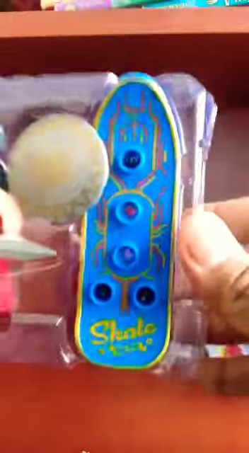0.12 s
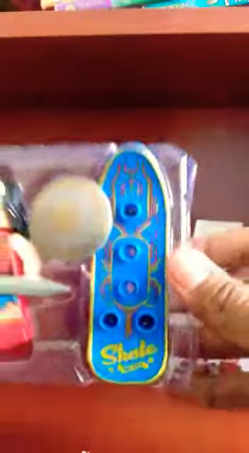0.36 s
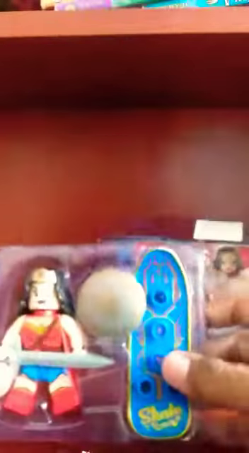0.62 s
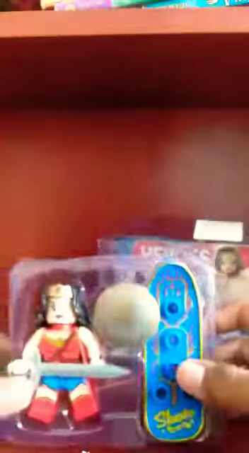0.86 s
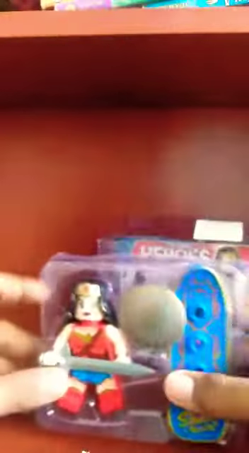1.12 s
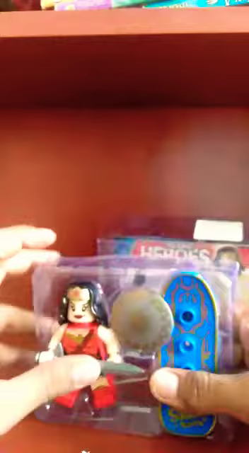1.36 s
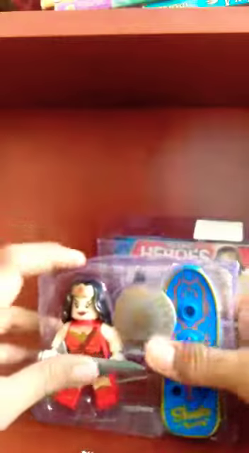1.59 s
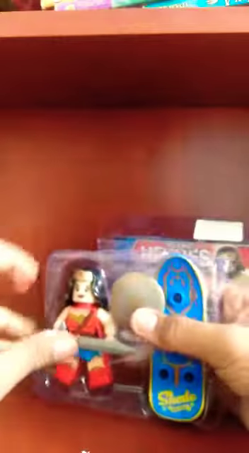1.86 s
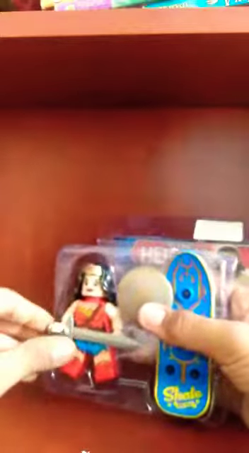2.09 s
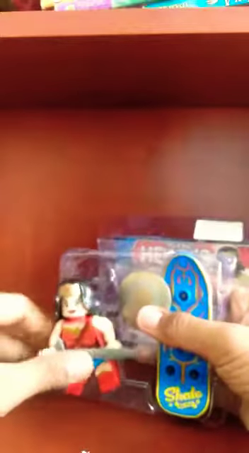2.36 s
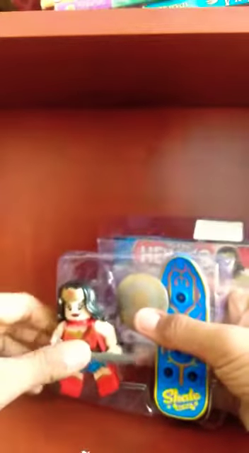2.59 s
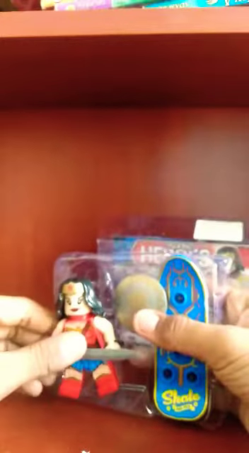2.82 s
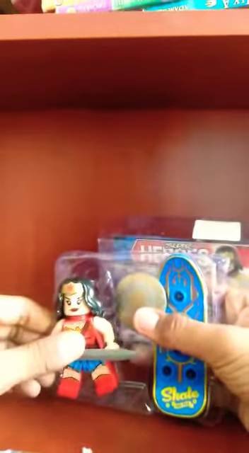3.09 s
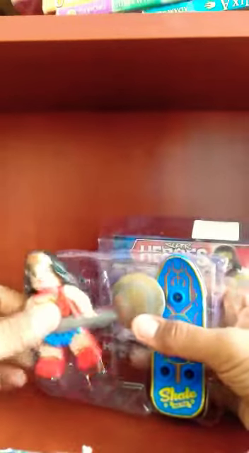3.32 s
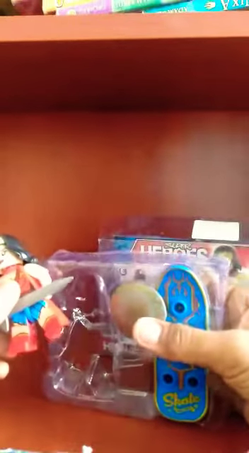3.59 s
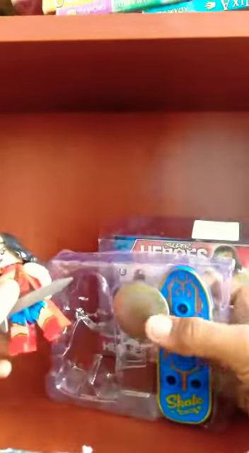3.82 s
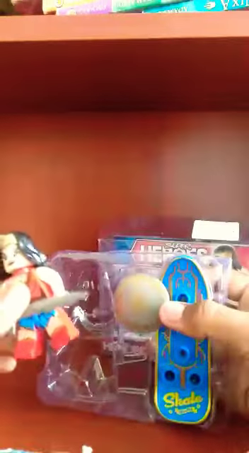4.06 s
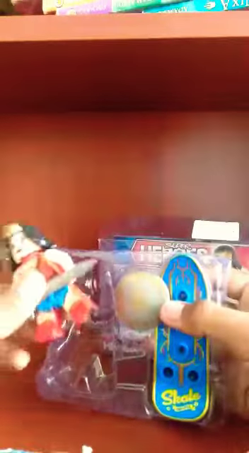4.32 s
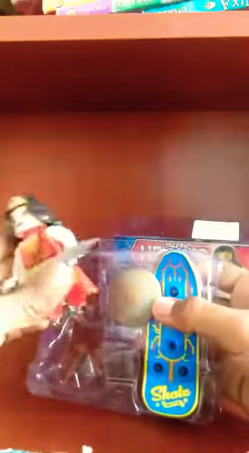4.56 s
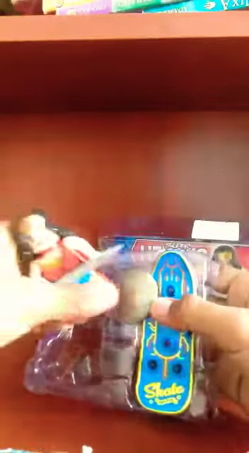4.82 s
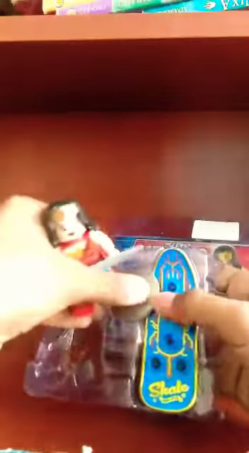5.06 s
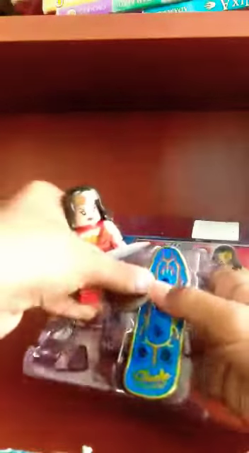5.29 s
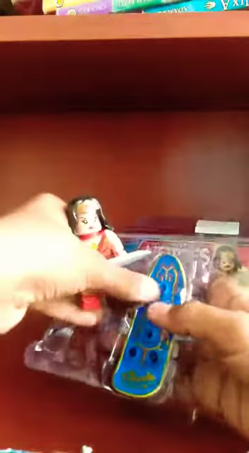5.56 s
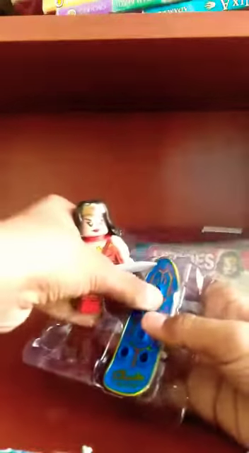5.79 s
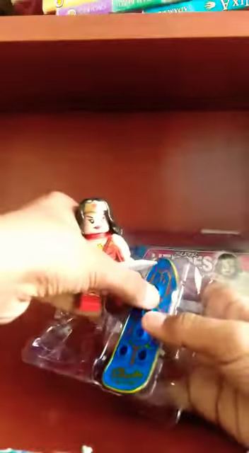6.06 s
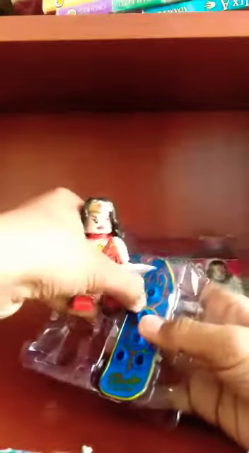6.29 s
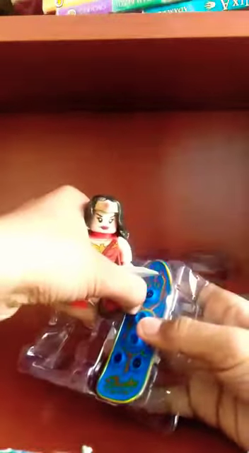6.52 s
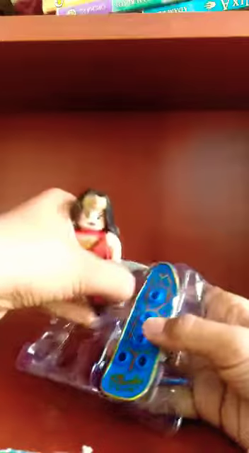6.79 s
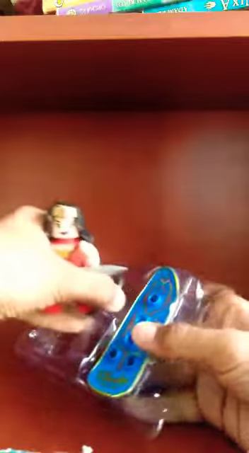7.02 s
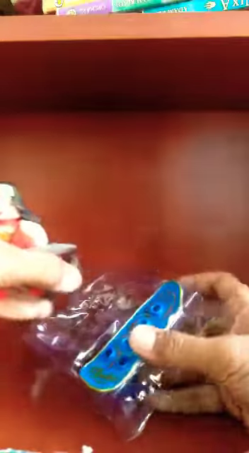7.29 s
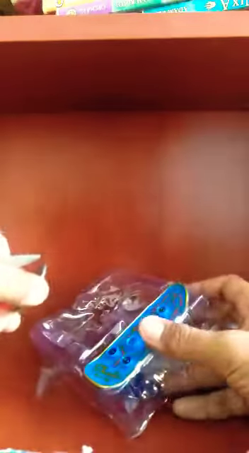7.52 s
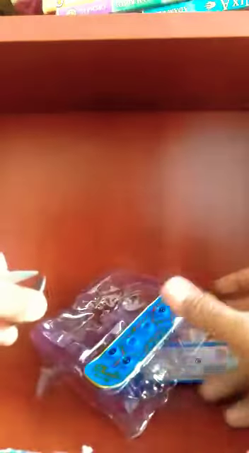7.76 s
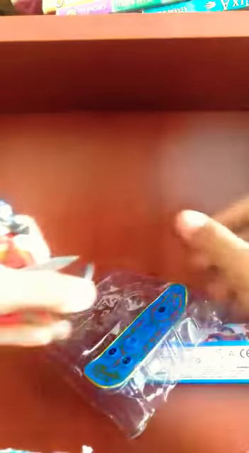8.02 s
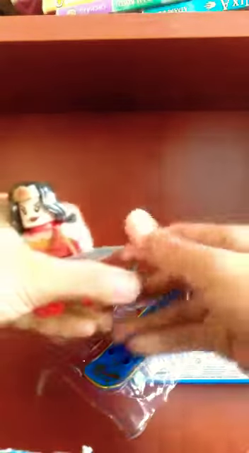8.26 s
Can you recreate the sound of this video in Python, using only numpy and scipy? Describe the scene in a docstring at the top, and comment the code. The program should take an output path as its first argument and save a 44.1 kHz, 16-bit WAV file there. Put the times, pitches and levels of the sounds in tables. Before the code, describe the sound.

Thin clear plastic tray crackles, snaps and pops sharply in two busy spells as hands pull toys free, close up indoors.

```python
"""On a wooden shelf in a quiet room, hands pull toys out of a thin clear plastic tray, heard close up.
Buckles snap as short rings of tray modes with a noise crack; drags are swelling bursts of coloured noise.
Random creases make a dense crackle, and the tray's sharp sounds get a faint room answer.
The shelf murmurs and thuds in low noise under the hands; steady hum, hiss and rumble lie behind."""
import sys
import numpy as np
from scipy import signal
from scipy.fft import rfft, irfft, next_fast_len
from scipy.io import wavfile
from scipy.ndimage import map_coordinates

SR = 44100
rng = np.random.default_rng(int(sys.argv[2]) if len(sys.argv) > 2 else 0)


def transcribe(signal):
    """Save signal, clipped to [-1, 1], as a 16-bit WAV file at the path in sys.argv[1]."""
    frames = np.atleast_2d(signal).T
    limited = np.clip(frames, -1, 1)
    pcm = np.round(limited * 32767).astype(np.int16)
    wavfile.write(sys.argv[1], SR, pcm)


def voltage_ratio(decibels):
    """Convert decibels (scalar or array-like) to amplitude ratios, 20 dB per decade."""
    exponent = np.asarray(decibels, float) / 20
    return 10 ** exponent


N = 369999  # samples

# Buckles: (time [s], ring peak [dB], panel pitch [Hz], hollow-mode offset [dB], crack offset [dB])
BUCKLES = [(0.199, -37.5, 1560, -11, -16), (0.224, -33, 878, -29, -16.5), (0.681, -31.5, 1085, -9.5, -17),
           (0.767, -27.5, 1380, -19, -31), (0.781, -23, 1130, -8, -41), (0.924, -28, 1085, -5, -31),
           (0.992, -21.5, 1040, -18, -32), (1.077, -21.5, 1030, -9, -30), (1.09, -18, 1040, -10, -25),
           (1.098, -12.5, 1030, -22, -25), (1.109, -8.5, 1535, -37, -24.5), (1.127, -28, 1560, -23, -17),
           (1.208, -18, 1040, -13, -14.5), (1.28, -25.5, 1135, -29, -34), (1.295, -29.5, 2035, -38, -13.5),
           (1.305, -29.5, 1460, -29, -13), (1.367, -35.5, 1390, 14, -27), (1.401, -32.5, 1040, -17, -33),
           (1.61, -29.5, 1040, -10, -22), (1.633, -11, 1120, -28, -22.5), (1.64, -20.5, 1000, -14, -36),
           (1.75, -29, 1055, -15, -31), (1.792, -30.5, 1020, -10, -28), (2.175, -32.5, 1160, -16.5, -26),
           (2.223, -16.5, 1164, -12.5, -32), (2.249, -22, 1200, -10.5, -27), (2.28, -23.5, 1870, -10, -38),
           (2.361, -24.5, 1210, -15.5, -44), (2.449, -31, 1730, -13, -15), (2.458, -31.5, 1730, -15, -12),
           (2.539, -18.5, 1150, -18, -25.5), (2.68, -32.5, 1250, -19, -42), (2.716, -31, 1200, -23, -42),
           (3.214, -30, 1110, -6, -43), (4.197, -26.5, 1190, -12, -44), (4.266, -35, 1090, -21, -39),
           (4.438, -35.5, 1104, -8, -31), (4.784, -36, 1110, 12, -35), (4.795, -32.5, 880, 10, -39),
           (4.923, -33.5, 960, -13, -33), (5.157, -28.5, 1130, -20, -36), (5.21, -31, 1020, -10, -31),
           (5.259, -30, 1150, -12, -30), (5.434, -32, 1040, -17, -25), (5.453, -29, 1070, -20, -19),
           (5.496, -30.5, 1190, -35, -20), (5.513, -21.5, 1094, -38, -11), (5.525, -19.5, 1080, -24, -17),
           (5.538, -19, 1040, -23, -14.5), (5.576, -26.5, 1530, -15, -17), (5.599, -26, 1420, -24, -17),
           (5.616, -16.5, 1120, -37, -40), (5.667, -19.5, 1140, -21, -19), (5.677, -20.5, 1040, -25, -10),
           (5.7, -16, 1044, -48, -15), (5.711, -32, 1030, -21, -12), (5.761, -21.5, 1260, -10, -25),
           (5.796, -22.5, 1040, -21, -14.5), (5.841, -25.5, 1020, -11, -33), (5.864, -23.5, 1055, -12, -21),
           (5.935, -32, 1320, -11, -24), (6.16, -33, 1100, -13, -30), (6.39, -28.5, 1040, -9.5, -23),
           (6.548, -10.5, 1095, -15, -19.5), (6.668, -10, 1180, -13.5, -21),
           (6.709, -7.5, 1060, -13.5, -23.5), (6.765, -25, 920, -16, -17), (6.9, -32, 1210, -12, -15.5),
           (6.957, -22, 1450, -32, -9), (6.998, -27, 1170, -28, -21), (7.194, -27.5, 1010, -42, -23),
           (7.214, -28, 1000, -23, -29), (7.231, -30, 1450, -23, -30), (7.272, -28, 1540, -28, -19),
           (7.319, -29.5, 1310, -28, -33)]
# Nominal tray modes: (frequency [Hz], level [dB], t60 [s])
TRAY_MODES = [(296, -18, 0.034), (493, -5, 0.055), (603.7, -5.5, 0.066), (762, -5.5, 0.034),
              (1040, -2.5, 0.047), (1200, -6, 0.056), (1400, -8, 0.039), (1605, -5.5, 0.057),
              (1983, 4.5, 0.021), (2313, -1.5, 0.03), (2633, -10.5, 0.019), (3204, -10, 0.019),
              (3705, -14, 0.015), (4060, -16, 0.029)]
# Upper-mode level as the grip moves over the tray: (time [s], level [dB])
GRIP_BITE = [(0.2, -3.5), (0.8, -12), (1.1, -3.5), (1.25, -16), (1.63, -4), (2.2, -9.5), (2.36, -5),
             (2.54, -3), (2.72, -7.5), (3.2, -16), (4.2, -6), (4.3, -24), (5.3, -15), (5.55, -5),
             (5.68, -17), (5.84, -11), (5.87, -3), (6.55, -14), (6.67, -1.5), (7.3, -7.5)]
BITE_PER_OCTAVE_DB = 2  # higher snaps bite more
# Plastic dragged on plastic: (time [s], length [s], body level [dB], fizz level [dB], panel pitch [Hz])
DRAGS = [(0.764, 0.19, -41.5, -75, 1100), (0.889, 0.054, -39.5, -60.5, 1070),
         (1.073, 0.16, -36.5, -50.5, 1300), (1.246, 0.064, -43, -61, 1090), (1.631, 0.048, -52, -52, 1100),
         (1.743, 0.1, -43, -60, 1090), (2.184, 0.041, -43.5, -63, 1150), (2.248, 0.11, -43.5, -64, 1130),
         (2.413, 0.031, -43, -61, 1500), (2.456, 0.041, -61, -72, 3450), (2.547, 0.081, -62, -77, 3070),
         (3.201, 0.11, -45, -86, 1080), (3.519, 0.11, -54.5, -82, 1100), (3.865, 0.083, -56, -66, 1020),
         (3.96, 0.12, -43, -64, 1070), (4.385, 0.13, -48, -67, 1040), (4.802, 0.027, -42.5, -80, 1020),
         (5.014, 0.098, -45.5, -86, 1000), (5.139, 0.034, -41.5, -67, 1070), (5.203, 0.057, -42, -63, 1040),
         (5.296, .07, -44.5, -60, 1060), (5.548, 0.066, -37.5, -54, 1440), (5.738, 0.077, -44, -60, 1030),
         (5.865, 0.049, -46, -67, 1050), (5.87, 0.088, -56, -71, 2860), (6.27, .06, -45.5, -71, 680),
         (6.36, 0.053, -43.5, -63, 1110), (6.548, 0.098, -34.5, -47, 1910), (6.636, 0.04, -36, -40, 1600),
         (6.69, .09, -51, -57, 1880), (6.938, 0.044, -31.5, -38, 2140), (6.98, 0.036, -41, -51, 1860),
         (7.14, 0.13, -44.5, -60, 980), (7.226, 0.089, -44, -61, 1400), (7.312, 0.054, -45, -73, 1390)]
PANEL_DB = 15  # rubbed panel over the top of the crackle spectrum
LIGHT_DB, SPREAD_PER_DB = -47.5, 1.07  # harder drags shake the whole tray: the panel stands out less
# Spectrum of the rustling body: (frequency [Hz], relative level [dB])
BODY_SPECTRUM = [(150, -52), (250, -26.5), (474, -0.5), (668, -4), (788, -5.5), (1120, 3), (1280, -1),
                 (1890, -4), (2570, -14), (2810, -21), (3500, -24), (4550, -47), (7700, -120)]
# Spectrum of the fine fizz and the cracks: (frequency [Hz], relative level [dB])
FIZZ_SPECTRUM = [(1530, -22), (2600, -2.5), (2790, -3.5), (3890, -2), (4640, -9.5), (6280, -1.5),
                 (8960, -17.5), (12100, -15), (13100, -12.5), (14900, -10), (16100, -23), (16500, -44)]
# Crackle of the strained tray: (time [s], body level [dB], fizz level [dB])
STRAIN_LEVELS = [(0.0, -71, -92), (0.2, -60.5, -63), (0.58, -48, -59.5), (0.75, -52.5, -59),
                 (1.11, -44, -64), (1.55, -52, -60.5), (1.8, -48, -63.5), (2.15, -59.5, -65.5),
                 (2.6, -95, -103), (2.82, -57.5, -61), (3.3, -61, -86), (3.57, -59, -66), (4.2, -62, -76),
                 (4.6, -55, -69), (4.75, -60, -69), (5.2, -59, -77.5), (5.62, -43, -59),
                 (5.9, -52.5, -65.5), (6.101, -44.5, -63), (6.5, -48.5, -59.5), (6.68, -32.5, -39.5),
                 (6.89, -57.5, -74), (7.0, -50, -66), (7.27, -50, -59.5), (7.42, -49.5, -64.5),
                 (7.5, -69, -94)]
# Decay of the room answer: (frequency [Hz], t60 [s])
ROOM_DECAY = [(300, 0.26), (1200, 0.17), (6000, 0.3), (15000, 0.21)]
# Spectrum of the shelf: (frequency [Hz], relative level [dB])
SHELF_SPECTRUM = [(60, -15), (100, 3.5), (140, -7), (185, 10.5), (230, 4), (295, 9), (400, 4), (600, -46)]
SHELF_UNDER_DB = -14.5  # shelf murmur relative to the crackle's body
# Hands or tray bear down on the shelf: (time [s], hold [s], level [dB], board pitch [Hz])
SHELF_PRESSES = [(0.6, .03, -72, 300), (0.905, 0.023, -58, 300), (0.996, 0.015, -57, 200),
                 (1.1, 0.041, -53, 252), (1.27, 0.027, -56, 252), (1.643, 0.018, -54, 302),
                 (2.306, 0.12, -66, 302), (3.254, 0.03, -56, 350), (4.269, 0.068, -44.5, 199),
                 (4.392, 0.042, -55, 200), (4.563, 0.023, -55.5, 190), (5.596, 0.18, -47, 142),
                 (5.767, 0.062, -49, 354), (5.865, .03, -47, 280), (6.267, 0.031, -52, 247),
                 (6.68, .06, -42, 230)]
PRESS_RISE_S, PRESS_FALL_S = 0.0075, 0.014  # time constants
BOARD_DB = 15.5  # pressed board over the shelf spectrum
# The tray is set down, one row: (time [s], push gain [dB], push time scale [s])
SET_DOWN = (7.557, -39, .0016)
# Spectrum of room air and microphone hiss: (frequency [Hz], relative level [dB])
AIR_SPECTRUM = [(12, -29), (20, 1), (135, -9), (200, -7), (297, -12), (506, -5), (794, -9), (1140, -4),
                (1560, -7), (1900, -12), (4530, -28), (6350, -24), (8410, -35), (14700, -30), (16500, -42)]
# Spectrum of the low rumble: (frequency [Hz], relative level [dB])
RUMBLE_SPECTRUM = [(12, -15), (22, 5.5), (50, -15), (90, -10), (130, -41.5)]
AIR_DB, RUMBLE_DB = -56, -62.0
# Microphone band edge: (frequency [Hz], gain [dB])
BAND_EDGE = [(20, 0), (15600, 0), (15900, -22), (20000, -22)]


def unit(x):
    """Scales x to rms 1."""
    return x / np.sqrt(np.mean(x ** 2) + 1e-20)


def coloured(x, points):
    """Filters x by (frequency [Hz], gain [dB]) points joined on a log-frequency axis."""
    size = next_fast_len(len(x) + 8192)
    hz, db = np.transpose(points)
    bin_hz = np.fft.rfftfreq(size, 1 / SR)
    gain_db = np.interp(np.log(bin_hz + 1), np.log(hz + 1), db)
    return irfft(rfft(x, size) * voltage_ratio(gain_db), size)[:len(x)]


def wobble(rate_hz):
    """Smooth random curve with rate_hz knots a second."""
    knots = rng.standard_normal(int(N * rate_hz / SR) + 4)
    return map_coordinates(knots, [np.arange(N) * rate_hz / SR])


def snaps():
    """Each buckle rings the tray modes nearest its pitch, sounds the hollow pockets, bites and cracks."""
    t = np.arange(SR // 8) / SR
    hz, mode_db, t60_s = np.transpose(TRAY_MODES)[:, :, None]
    out = np.zeros(N + len(t))
    for start_s, peak_db, ring_hz, hollow_db, crack_db in BUCKLES:
        bite_db = np.interp(start_s, *np.transpose(GRIP_BITE))
        bite_db += BITE_PER_OCTAVE_DB * np.log2(ring_hz / 1000)
        near_db = -5 * np.abs(np.log2(hz / ring_hz))  # favours modes near the panel's own size
        level_chance, pitch_chance, phase = rng.standard_normal((3, len(TRAY_MODES), 1))
        level_db = np.select([hz < 850, hz > 1750], [hollow_db + 10.5, bite_db], near_db)
        level_db = level_db + mode_db + 3 * level_chance

        # the sheet keeps bending, so no mode rings clean
        drift = np.cumsum(0.05 * rng.standard_normal((len(TRAY_MODES), len(t))), 1)
        angle = 2 * np.pi * hz * (1 + 0.037 * pitch_chance) * t + phase + drift
        modes = voltage_ratio(level_db - 60 * t / t60_s) * np.sin(angle)

        # a flip that leaves the pockets quiet is a slow one
        swell_s = np.clip(0.0006 - 0.00003 * hollow_db, 0.0004, 0.003)
        u = t / swell_s
        # the panel swells as it flips, then a finger damps it
        panel = voltage_ratio(6.5) * u * u * np.exp(-u) * np.sin(2 * np.pi * ring_hz * t)
        ring = modes.sum(0) * (1 - np.exp(-u)) + panel
        ring = ring / np.abs(ring).max()

        crack = coloured(rng.standard_normal(len(t)), FIZZ_SPECTRUM) * u * np.exp(-u / 1.85)
        crack = voltage_ratio(crack_db + 8.0) * crack / np.abs(crack).max()
        out[round(start_s * SR):][:len(t)] += voltage_ratio(peak_db) * (ring + crack)
    return out[:N]


def scuffs():
    """A drag is a dense run of slips that swells and fades, loudest at the panel it rubs."""
    out = np.zeros(N)
    for start_s, length_s, body_db, fizz_db, panel_hz in DRAGS:
        panel_db = PANEL_DB - np.interp(panel_hz, *np.transpose(BODY_SPECTRUM))
        panel_db -= SPREAD_PER_DB * max(body_db - LIGHT_DB, 0)
        panel = [(panel_hz / 1.43, 0), (panel_hz, panel_db), (panel_hz * 1.25, 0)]
        stroke = signal.windows.tukey(round(length_s * SR), 0.5)
        slips = voltage_ratio(2.8 * wobble(160))[:len(stroke)] * rng.standard_normal((2, len(stroke)))
        body = unit(coloured(coloured(slips[0], BODY_SPECTRUM), panel))
        fizz = unit(coloured(slips[1], FIZZ_SPECTRUM))
        start = round(start_s * SR)
        out[start:start + len(stroke)] += stroke * (voltage_ratio(body_db) * body + voltage_ratio(fizz_db) * fizz)
    return out


def room(x):
    """Shelf walls and room answer; a new noise tail every quarter second as the hands move."""
    out, step = np.zeros(N + 2 * SR), SR // 4
    hz, t60_s = np.transpose(ROOM_DECAY)
    for start in range(0, N, step):
        f, t, z = signal.stft(rng.standard_normal(SR // 3), SR, nperseg=256)
        decay = voltage_ratio(-60 * t / np.interp(f, hz, t60_s)[:, None])
        tail = signal.istft(z * decay, SR, nperseg=256)[1]
        answer = signal.fftconvolve(x[start:start + step], tail / np.linalg.norm(tail))
        out[start + 200:][:len(answer)] += answer  # delay in samples
    return out[:N]


def strain():
    """Gains of crackle body and fizz; -120 dB once the hands let go."""
    time_s, *levels_db = np.transpose(STRAIN_LEVELS)
    t = np.arange(N) / SR
    return [voltage_ratio(np.interp(t, time_s, db, right=-120)) for db in levels_db]


def creases(count, spread_db, life_s):
    """Tiny creases give way at random: short noise bursts, a few much larger than the rest."""
    sizes = voltage_ratio(spread_db * rng.exponential(size=count))
    kicks = np.bincount(rng.integers(0, N, count), sizes, N)
    burst = np.exp(-np.arange(SR // 20) / (SR * life_s))
    envelope = np.abs(signal.fftconvolve(kicks, burst)[:N])
    return envelope * rng.standard_normal(N)


def crackle():
    """The strained tray crackles: a body rustle and a finer fizz of creases, fluttering together."""
    flutter = voltage_ratio(2.8 * wobble(30))
    body = creases(count=7000, spread_db=1.5, life_s=0.012)
    body = unit(flutter * coloured(body, BODY_SPECTRUM))
    fizz = creases(count=9000, spread_db=4.0, life_s=0.021)
    fizz = unit(flutter * coloured(fizz, FIZZ_SPECTRUM))
    body_gain, fizz_gain = strain()
    return voltage_ratio(1.83 * wobble(6)) * (body_gain * body + fizz_gain * fizz)


def shelf():
    """The shelf murmurs with the strain, thuds under each press and once as the tray is set down."""
    lumps = voltage_ratio(3.4 * wobble(25)) * coloured(rng.standard_normal(N), SHELF_SPECTRUM)
    out = voltage_ratio(SHELF_UNDER_DB) * strain()[0] * unit(lumps)
    lead_s = 0.15
    late_s = np.arange(SR // 2) / SR - lead_s
    for press_s, hold_s, level_db, board_hz in SHELF_PRESSES:
        first = round((press_s - lead_s) * SR)
        rise = np.minimum(late_s / PRESS_RISE_S, 0)
        fall = np.maximum(late_s - hold_s, 0) / PRESS_FALL_S
        load = np.exp(rise - fall)
        resonance = [(board_hz / 1.47, 0), (board_hz, BOARD_DB), (board_hz * 1.42, 0)]
        board = coloured(lumps[first:][:len(late_s)], resonance)
        out[first:][:len(late_s)] += voltage_ratio(level_db) * load * unit(board)
    thud_s, gain_db, scale_s = SET_DOWN
    u = (np.arange(N) / SR - thud_s) / scale_s
    push = u * (u - 1) * np.exp(-np.clip(u, -5, 5) ** 2)
    return out - voltage_ratio(gain_db) * push


def hum():
    """Room air and microphone hiss, wavering a little, over a low unsteady rumble."""
    air = unit(coloured(rng.standard_normal(N), AIR_SPECTRUM))
    air = voltage_ratio(AIR_DB + 1.2 * wobble(3)) * air
    rumble = unit(coloured(rng.standard_normal(N), RUMBLE_SPECTRUM))
    return air + voltage_ratio(RUMBLE_DB + 0.82 * wobble(1.95)) * rumble


def scene():
    """Sums tray, its room answer, crackle, shelf and hum."""
    tray = snaps() + scuffs()
    return (tray + voltage_ratio(-8.5) * room(tray) + crackle() + shelf() + hum())[None]


def roll_off(x):
    """The treble ends steeply here."""
    return signal.sosfilt(signal.butter(12, 16840, fs=SR, output="sos"), x)


def record(dry):
    """The microphone's band edge rolls off the extreme treble."""
    mix = coloured(dry[0], BAND_EDGE)[None]
    return roll_off(mix)


dry = scene()
out = record(dry)
transcribe(out)
```